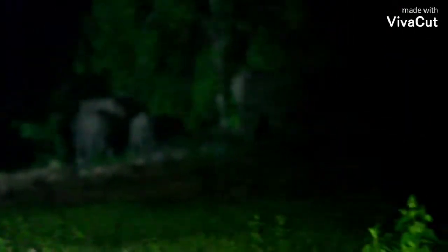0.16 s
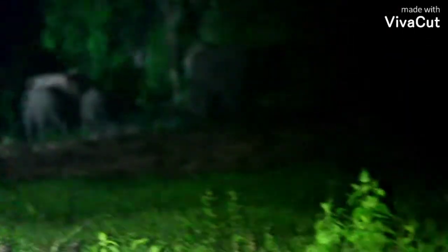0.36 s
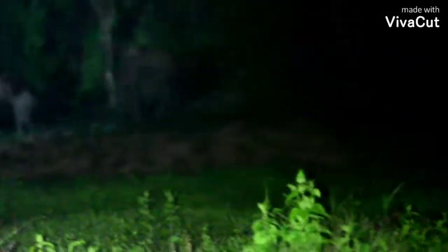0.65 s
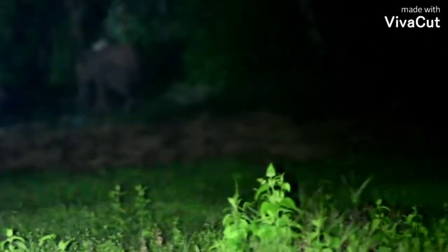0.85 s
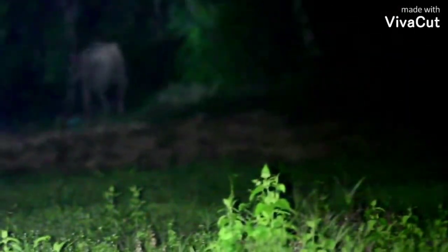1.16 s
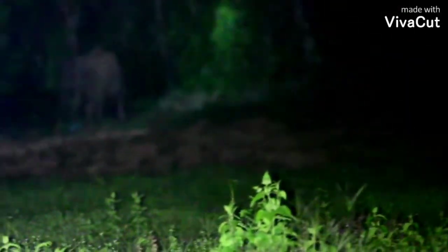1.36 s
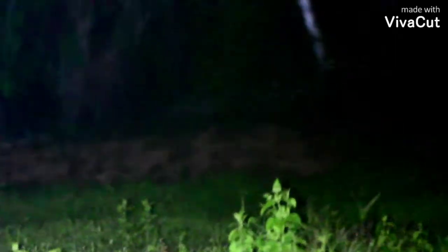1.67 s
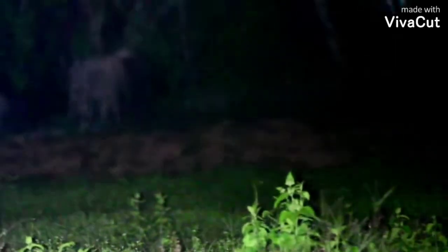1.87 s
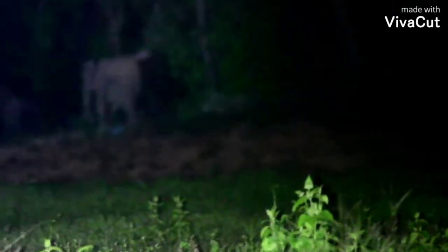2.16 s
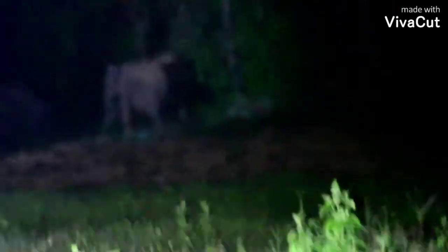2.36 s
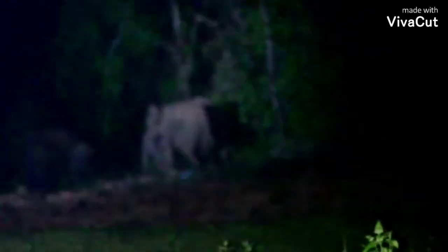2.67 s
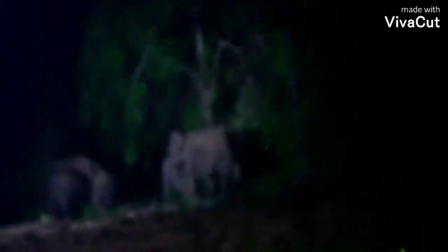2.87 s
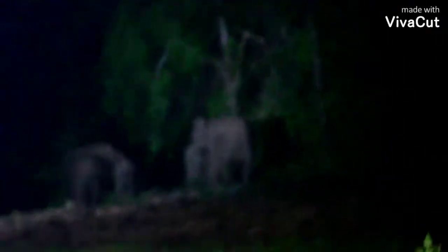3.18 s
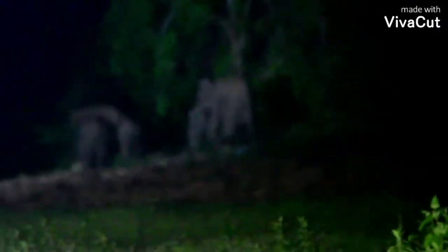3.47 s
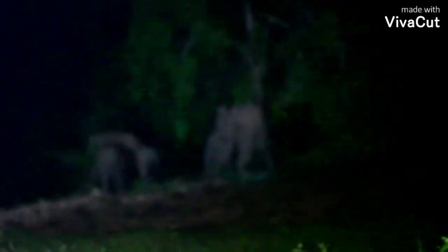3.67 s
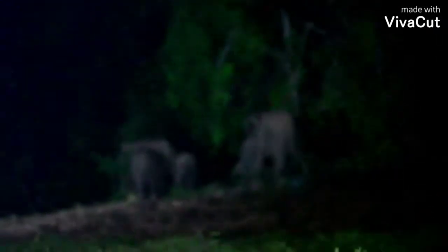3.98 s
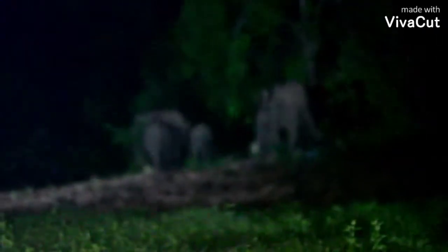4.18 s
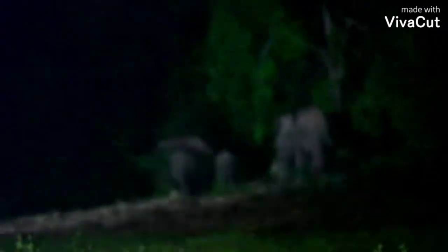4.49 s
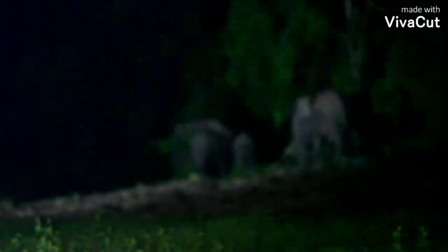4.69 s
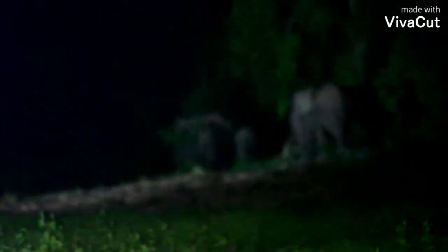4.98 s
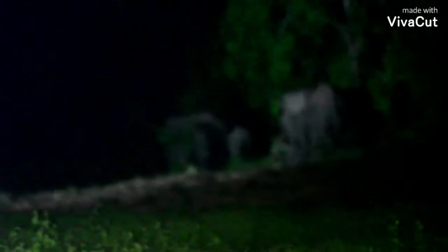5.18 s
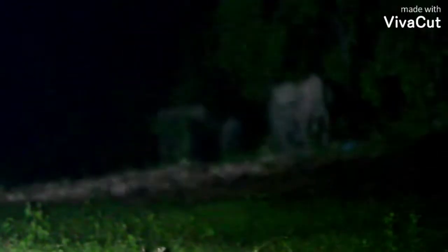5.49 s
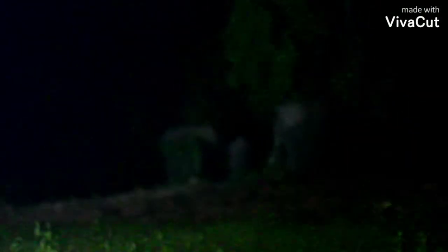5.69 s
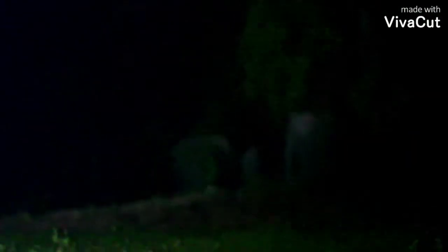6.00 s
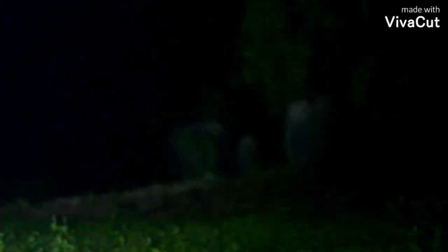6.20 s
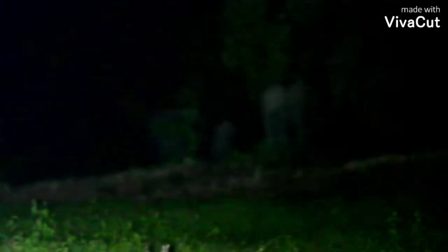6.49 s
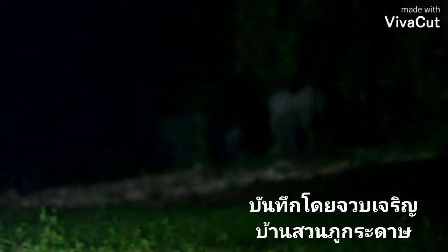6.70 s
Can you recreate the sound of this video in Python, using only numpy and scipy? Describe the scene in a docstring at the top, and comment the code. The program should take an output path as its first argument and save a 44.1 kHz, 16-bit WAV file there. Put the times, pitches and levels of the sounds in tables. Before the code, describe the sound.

At a forest edge at night, crickets hold a high, pulsing trill, joined by thinner, faster trillers and brief insect chirps. Dull handling bumps cluster at the start. A faint distant engine putters low, dips slightly, then speeds up around three seconds and settles into a throbbing drone. The hand-held microphone catches light rustles and ticks, with the insects stronger on the right.

```python
"""Crickets trill near 3 kHz at a forest edge at night, with higher trills and short insect bouts around them.
Every insect note is a short tone with a sliding pitch, returned by echoes among the trees.
A far single-cylinder engine putters, then speeds up under load to a steady drone: puffs ring resonances.
The hand-held microphone adds soft bumps, ticks and rustles: struck resonances and short noise.
Under it all lies night air, made of stereo noise bands that flicker separately."""
import sys
import numpy as np
from scipy import signal
from scipy.io import wavfile
from scipy.ndimage import uniform_filter1d

SR = 44100
rng = np.random.default_rng(int(sys.argv[2]) if len(sys.argv) > 2 else 0)


def master_out(mix):
    """Clip the mix to full scale and print it as 16-bit PCM to the path in sys.argv[1]."""
    frames = np.transpose(np.atleast_2d(mix))
    ceiling = np.clip(frames, -1, 1)
    pcm = np.round(ceiling * 32767).astype(np.int16)
    wavfile.write(sys.argv[1], SR, pcm)


N = 302085
TIME = np.arange(N) / SR

# Choirs in order lead, lower, fast trillers, thin trillers: pitch_hz, sweep_hz within a pulse, pulses_per_s,
# voice_spread_hz, left_minus_right_db, echo_db against direct, left_ear_lag_s
CHOIRS = [(3038, -190, 61, 30, -9.5, -1, .00016), (2895, -170, 58, 35, -8.5, 1, .00016),
          (6250, 650, 72, 105, -8, -1, .00011), (8900, -700, 45, 190, -9.5, -2, .00015)]
# Level of the two cricket choirs as the hand-held microphone moves, before their added gains:
# time_s, lead_level_db, lower_level_db
CRICKET_LEVELS = [(0.0, -47.5, -53), (0.68, -47.5, -51.5), (0.84, -46, -46.5), (1.1, -51, -54),
                  (1.33, -45.5, -51), (1.55, -48.5, -59), (1.72, -46, -48), (1.98, -49.5, -60),
                  (2.4, -48, -51), (3.53, -48, -60.5), (3.59, -47.5, -45.5), (4.48, -48.5, -56),
                  (4.67, -45, -49), (4.98, -48.5, -53.5), (6.64, -50, -50), (6.85, -46, -58)]
# Phrases of the fast trillers: middle_s, peak_level_db
TRILLER_PHRASES = [(.26, -58), (.43, -53), (.62, -59), (.78, -50.5), (.98, -59), (1.16, -51), (1.35, -54),
                   (1.51, -52.5), (1.72, -55), (1.87, -52), (2.28, -54), (2.47, -51), (2.65, -52),
                   (2.82, -50.5), (3.0, -52.5), (3.17, -50.5), (3.62, -52), (3.84, -50.5), (3.99, -49.5),
                   (4.26, -52.5), (4.45, -51), (4.61, -49.5), (4.81, -50.5), (5.0, -54), (5.5, -55),
                   (5.66, -52), (6.25, -54.5)]
# Runs of single insects: start_s, length_s, level_db, song_name
INSECT_BOUTS = [(0.046, 0.19, -57.5, "shrill"), (.05, 0.087, -62, "falling"), (0.232, 0.2, -53, "low"),
                (0.276, 0.14, -55, "falling"), (.532, 0.14, -57.5, "falling"), (0.688, .15, -61, "falling"),
                (1.03, 0.083, -62, "falling"), (1.252, .12, -62, "falling"), (1.35, 0.33, -59, "low"),
                (1.466, .12, -64, "falling"), (1.89, .17, -59, "falling"), (2.07, 0.44, -58, "buzz"),
                (2.5, 0.3, -60, "low"), (3.595, 0.24, -58, "low"), (4.652, 0.23, -55, "low"),
                (5.26, 0.087, -63, "falling"), (5.48, 0.096, -62, "falling"), (5.697, .12, -59, "falling"),
                (5.782, 0.17, -53, "low"), (5.943, 0.1, -61, "falling"), (6.127, .086, -45, "bright"),
                (6.163, 0.098, -58, "falling"), (6.411, 0.36, -56.5, "buzz"), (6.418, .12, -59, "falling"),
                (6.73, .12, -55, "low")]
# Songs by name: pitch_hz, sweep_hz within a pulse, pulses_per_s
INSECT_SONGS = {"falling": (4850, -1150, 25), "low": (3470, -330, 26), "buzz": (5900, -700, 100),
                "bright": (9140, -300, 46), "shrill": (10560, -600, 56)}
# Thin steady singers far off: pitch_hz, width_hz, level_db
FAR_WHINES = [(3394, 55, -64), (6345, 90, -65), (14694, 25, -72.5)]

# Engine speed: time_s, firings_per_s
ENGINE_SPEED = [(0.0, 17.616), (1.3, 17.608), (1.8, 16.667), (2.1, 18.503), (2.5, 19.616), (2.9, 19.973),
                (3.15, 23.044), (3.4, 25.086), (4.3, 25.045), (5.2, 25.535), (6.85, 25.626)]
# Level of the exhaust bark, before its trim: time_s, level_db
BARK_LEVEL = [(0.7, -66.5), (1.19, -65.5), (1.36, -59.5), (2.79, -61), (3.6, -42.5), (4.45, -48.5),
              (4.67, -48), (6.8, -45.5)]
# Deep exhaust resonances: pitch_hz, width_hz, relative_idle_db, relative_load_db
THUD_RESONANCES = [(52.3, 6.7, -37, -11), (75.4, 23, 1, -4.5), (99.5, 22, 8, -6.5), (117, 16, 3.5, -38),
                   (145.7, 40.5, 10.5, -10.5), (179.1, 11.5, -2, -2), (223.8, 24, -1, 0.5),
                   (261, 35, -21, -3.5)]
# Upper exhaust resonances: pitch_hz, width_hz, relative_idle_db, relative_load_db
BARK_RESONANCES = [(330.9, 13.6, 15, 9.5), (352.5, 7.3, 8, 15), (367.2, 4.2, -36, 11), (550, 11, -18, -15),
                   (790, 18, -3, 13)]
# Bands of rushing exhaust gas: pitch_hz, width_hz, idle_level_db, load_level_db
GAS_BANDS = [(337.5, 130, -59, -53), (490, 102, -72, -60.5), (1161, 120, -63.5, -68.5),
             (1570, 440, -89, -65)]

# Bumps on the microphone body, before the trim: time_s, peak_db, left_minus_right_db
MIC_BUMPS = [(0.009, -31.5, -13), (0.061, -33, -17), (0.127, -29, -23), (0.164, -26.5, -31),
             (0.388, -32, -16), (0.451, -27, -11), (0.555, -32, 5), (0.899, -36, 17), (3.419, -42, 17),
             (4.386, -47, -12), (4.839, -33.5, -2), (6.008, -32.5, -26)]
# Light rustles: start_s, level_db, t60_s (time to fall 60 dB)
MIC_RUSTLES = [(.327, -49.5, .2), (.69, -48, 0.14), (2.425, -47, 0.36), (3.51, -47, 0.14),
               (3.895, -41.5, 0.15), (4.805, -46.5, 0.58), (5.935, -51, 0.16), (6.375, -45, 0.21)]
# Small dry ticks, before their trim: start_s, peak_db
MIC_TICKS = [(0.376, -29), (6.333, -24)]
# Spectrum of the grip's rumble: frequency_hz, relative_db_per_hz
RUMBLE_SPECTRUM = [(25, -17), (50, -12.5), (80, -5), (140, -18), (250, -29.5), (600, -42), (2000, -66)]
# Spectrum of rustles and ticks: frequency_hz, relative_db_per_hz
RUSTLE_SPECTRUM = [(100, -24), (1500, -3), (4500, 0), (9000, -1), (14000, -14)]

# Spectrum of the night air: frequency_hz, relative_db_per_hz
AIR_SPECTRUM = [(30, 5), (70, 14.5), (200, 9.5), (400, 2.5), (650, 2), (1100, 0.5), (2000, -2), (3000, 1.5),
                (3800, -1.5), (5200, 0.5), (6500, 8.5), (7500, -6.5), (9300, -11.5), (11000, -9),
                (15000, -14)]
# How alike the two ears hear diffuse noise: frequency_hz, left_right_correlation (no unit)
EAR_LIKENESS = [(50, 0.092), (300, 0.62), (1000, 0.37), (2000, 0.17), (6000, 0.055), (14000, 0.049)]
# Stereo tilt of diffuse noise: frequency_hz, left_minus_right_db
EAR_BALANCE = [(50, -5), (500, 2.5), (2000, -3), (5000, -2), (9000, -1.5), (12000, -1.5)]


def from_db(db):
    """Decibels to gain."""
    return 10 ** (np.asarray(db) / 20)


def rms_one(x):
    """Scale to unit rms."""
    return x / np.sqrt(np.mean(x ** 2) + 1e-20)


def in_time(rows):
    """Draw each column of a table as a curve over the whole scene."""
    times, *columns = np.transpose(rows)
    return [np.interp(TIME, times, column) for column in columns]


def at_hz(points, hz):
    """Read a spectrum on a log-frequency axis."""
    points = np.array(points)
    return np.interp(np.log(hz), np.log(points[:, 0]), points[:, 1])


def pan(balance_db):
    """Left and right gains with a mean of one."""
    gains = from_db(np.array([[.5], [-.5]]) * balance_db)
    return gains / gains.mean()


def drift(rate):
    """Smoothed random wandering with unit rms, faster for a higher rate."""
    step = 40  # samples between the points of the curve
    r = np.exp(-2 * step * np.pi * rate / SR)
    noise = rng.standard_normal(N // step + 2002)
    slow = signal.lfilter([1], [1, -2 * r, r * r], noise)[2000:]  # skip the filter's start
    return np.interp(np.arange(N) / step, np.arange(len(slow)), rms_one(slow))


def resonate(x, hz, width):
    """A two-pole resonance, width in Hz, with unit gain on top."""
    r = np.exp(-np.pi * width / SR)
    top = np.array([1, 0, -1]) * (1 - r * r) / 2
    poles = [1, -2 * r * np.cos(2 * np.pi * hz / SR), r * r]
    return signal.lfilter(top, poles, x + 1e-18)


def wing_strokes(strokes, hz, sweep_hz, duty):
    """Each closing of the wings draws a file over a scraper: a short tone whose pitch slides."""
    along = np.minimum(strokes % 1 / np.clip(duty, .1, 1), 1)
    pitch = hz + sweep_hz * (along - .5)
    tone = np.sin(2 * np.pi * np.cumsum(pitch) / SR)
    return rms_one(np.sin(np.pi * along) * tone)


def among_trees(x, echo_db, lag_s=.00015, count=10):
    """Sound reaches the left ear late; trunks return echoes whose paths change as the microphone moves."""
    t60_s, path_speed, sound_speed = 1, .4, 343  # s, greatest path change in m/s, m/s
    direct = np.array([np.interp(TIME - lag_s, TIME, x), x])
    echoes = np.zeros((2, N))
    for k, (u, v) in enumerate(rng.random((2 * count, 2))):
        delay = .002 + .11 * u * u
        path_change = (2 * v - 1) * path_speed / sound_speed * TIME
        echo = np.interp(TIME - delay - path_change, TIME, x)
        echoes[k % 2] += from_db(-60 * delay / t60_s) * echo
    echoes *= x.std() / echoes.std(axis=1, keepdims=True)
    echo_gain = from_db(echo_db)
    return (direct + echo_gain * echoes) / np.sqrt(1 + echo_gain ** 2)


def choirs(duty=.7, fall_db=2.0, swell_db=0.94, lead_db=5, lower_db=3, count=3):
    """Each choir is one near singer and fainter neighbours, at slightly different pitches and pulse rates."""
    lead, lower = in_time(CRICKET_LEVELS)
    levels = from_db(lead + lead_db), from_db(lower + lower_db), triller_level(), thin_level()
    out = 0
    for level, (hz, sweep_hz, per_s, spread_hz, balance_db, echo_db, lag_s) in zip(levels, CHOIRS):
        voices = 0
        for k in range(count):
            rate = per_s * (1 + .012 * drift(2) + .06 * k * rng.uniform(-1, 1))
            pitch = hz + spread_hz * ((k + 1) % count - 1 + .6 * drift(30))
            strokes = np.cumsum(rate) / SR + rng.random()
            voice = wing_strokes(strokes, pitch, sweep_hz, duty)
            # the near singer (k = 0) holds steady while its neighbours swell and fade
            voices = voices + voice * from_db(k * (swell_db * drift(2.9) - fall_db))
        out = out + rms_one(among_trees(voices, echo_db, lag_s)) * level * pan(balance_db)
    return out


def triller_level(phrase_s=.16, between_db=-57):
    """Short rounded phrases of one length stand out of a quiet running trill."""
    phrases = 0
    for middle_s, peak_db in TRILLER_PHRASES:
        along = np.clip((TIME - middle_s) / phrase_s, -.5, .5)
        phrases = phrases + from_db(peak_db) * np.cos(np.pi * along)
    return np.hypot(phrases, from_db(between_db))


def thin_level(mean_db=-59.5, wander_db=4.0):
    """The thin trill swells and sinks at random around a mean level."""
    return from_db(mean_db + wander_db * drift(3.5))


def bouts(waver_hz=40):
    """Single insects break in with short runs of sliding pulses, each pulse at a slightly different pitch."""
    out = 0
    for start, length, level_db, name in INSECT_BOUTS:
        hz, sweep_hz, per_s = INSECT_SONGS[name]
        age = TIME[:round(length * SR)]
        pulse = (age * per_s).astype(int)
        pitch = hz + waver_hz * rng.normal(size=99)[pulse]
        song = wing_strokes(age * per_s, pitch, sweep_hz, duty=.55)
        swell = np.sqrt(np.sin(np.pi * age / length).clip(0))  # each run swells and fades
        placed = np.interp(TIME - start, age, rms_one(song * swell), left=0, right=0)
        out = out + placed * from_db(level_db)
    return among_trees(out, echo_db=-9) * pan(-7)


def double_chirper(hz=7640, level_db=-69):
    """A small cricket gives two notes and rests for two, four times a second."""
    strokes = (TIME - .095) * 16.08  # notes and rests per second
    song = wing_strokes(strokes, hz + 22 * drift(30), sweep_hz=-60, duty=.5)
    song = song * (strokes % 4 < 2)
    return among_trees(song * from_db(level_db), echo_db=-6) * pan(-8)


def engine(second_s=0.00824, second_share=0.58, soft_hz=500, muffled_hz=210, open_bark_db=-58, bark_db=-1,
           full_rush_db=-58, intake_s=0.0196, intake_hz=110, intake_width=70, intake_db=-5, muffler_width=170):
    """One soft exhaust puff per firing rings the pipe; load shifts the ring upwards."""
    rate, = in_time(ENGINE_SPEED)
    bark_level, = in_time(BARK_LEVEL)
    # the thud grows by 0.7759 dB for each firing per second above 17
    thud_level = -50.5 + 0.7759 * (rate - 17)
    # load is read from the speed: 0 at the slowest, 1 at the fastest
    load = np.clip((rate - rate.min()) / np.ptp(rate), 0, 1) ** 2
    cycles = np.cumsum(rate) / SR + .14
    # firings grow more even under load
    unevenness_db = (1.2 - .7 * load) * drift(10)
    puffs = -np.diff(np.floor(cycles), prepend=0) * from_db(unevenness_db)
    # at idle a second puff follows each firing
    puffs = puffs + second_share * (1 - load) * np.interp(TIME - second_s, TIME, puffs)
    # the valve opens gradually and distance dulls the edge
    puffs = signal.sosfilt(signal.butter(4, soft_hz, fs=SR, output="sos"), puffs)

    def pipe(modes):
        """The resonances ring together, at an even overall level."""
        ring = 0
        for hz, width, idle, full in modes:
            # the muffler chamber makes each ring build up gradually
            mode = resonate(resonate(puffs, hz, muffler_width), hz, width)
            ring = ring + mode * from_db(idle + (full - idle) * load)
        return ring / np.sqrt(uniform_filter1d(ring ** 2, size=SR // 2) + 1e-20)

    # between firings the working engine gulps air
    gulp = resonate(np.interp(TIME - intake_s, TIME, puffs), intake_hz, intake_width)
    gulp = resonate(gulp, intake_hz, 3 * intake_width)
    intake = rms_one(gulp) * load * from_db(intake_db)
    # gas rushes strongest at each firing, and more as the bark grows
    pulsing = 1 + 0.25 * np.cos(2 * np.pi * cycles)
    rush = rng.standard_normal(N) * pulsing * from_db(np.minimum(bark_level - full_rush_db, 0))
    gas = 0
    for hz, width, idle, full in GAS_BANDS:
        band = rms_one(resonate(resonate(rush, hz, width), hz, 2 * width))
        gas = gas + band * from_db(idle + (full - idle) * load)
    thud = (pipe(THUD_RESONANCES) + intake) * from_db(thud_level)
    # while the bark is faint the thud is muffled too
    muffled = signal.sosfiltfilt(signal.butter(2, muffled_hz, fs=SR, output="sos"), thud)
    thud = muffled + (thud - muffled) * from_db(np.minimum(bark_level - open_bark_db, 0))
    bark = pipe(BARK_RESONANCES) * from_db(bark_level + bark_db)
    return thud * pan(-2.4) + (bark + gas) * pan(-2.3)


def handling(bump_hz=110, bump_width=55, bump_db=-1, unsteady_db=3, tick_t60=0.019, tick_db=-10):
    """The grip shifts: each dull bump stirs up a short rumble; light rustles and ticks come between."""
    grip_db, stir_db = -64.5, -8.5  # rumble at rest; stirred rumble against the listed bump peak
    stir_rise_s, stir_t60_s = .04, .45
    bumps, friction = np.zeros((2, N)), np.zeros(N)
    rumble_power = from_db(grip_db + unsteady_db * drift(1.6)) ** 2
    for s, peak_db, balance_db in MIC_BUMPS:
        tap = 1. * (np.arange(N) == round(s * SR))
        knock = resonate(resonate(tap, bump_hz, bump_width), bump_hz, 2 * bump_width)
        bumps -= knock / abs(knock).max() * from_db(peak_db + bump_db) * pan(balance_db)
        # the rumble rises just ahead of the bump and dies away after it
        rise = np.clip(1 + (TIME - s) / stir_rise_s, 0, 1)
        fall_db = 60 * np.clip((TIME - s) / stir_t60_s, 0, 2)
        rumble_power = rumble_power + (rise * from_db(peak_db + stir_db - fall_db)) ** 2
    ticks = [(s, peak_db + tick_db, tick_t60) for s, peak_db in MIC_TICKS]
    for s, level_db, t60 in list(MIC_RUSTLES) + ticks:
        rise = np.clip((TIME - s) / (0.037 * t60), 0, 1)
        friction += rise * from_db(level_db - 60 * np.clip((TIME - s) / t60, 0, 2))
    rumble = np.sqrt(rumble_power) * diffuse_noise(RUMBLE_SPECTRUM, patchy_db=1.5)
    grain = from_db(2 * drift(120))  # fast unevenness of the rubbing
    return bumps + rumble + friction * grain * diffuse_noise(RUSTLE_SPECTRUM, patchy_db=1.5)


def whines():
    """Far singers blur into narrow steady tones: noise through sharp resonances."""
    out = 0
    for (hz, width, level_db), balance_db in zip(FAR_WHINES, (-6, -6, 1)):
        noise = rng.standard_normal((2, N))
        tone = rms_one(resonate(resonate(noise, hz, width), hz, width))
        out = out + from_db(level_db) * tone * pan(balance_db)
    return out


def diffuse_noise(spectrum, patchy_db):
    """Half-octave bands of stereo noise, each with its own flicker, likeness and balance."""
    out, edges = 0, 24 * 2 ** np.arange(0, 9.6, .5)
    white = rng.standard_normal((2, 2, N))  # neighbouring bands take turns between two noises
    for k, (low, high) in enumerate(zip(edges, edges[1:])):
        band = signal.butter(2, [low, high], "band", fs=SR, output="sos")
        mid, side = signal.sosfilt(band, white[k % 2])
        hz = np.sqrt(low * high)
        alike = np.clip(at_hz(EAR_LIKENESS, hz), -1, 1)
        level_db = at_hz(spectrum, hz) + patchy_db * drift(11.3)
        stereo = np.sqrt(1 + alike) * mid + np.sqrt(1 - alike) * side * [[1], [-1]]
        out = out + from_db(level_db) * pan(at_hz(EAR_BALANCE, hz)) * stereo
    return rms_one(out)


def night_air(level_db=-49):
    """The soft bed of the night: broad noise whose bands flicker slightly."""
    return from_db(level_db) * diffuse_noise(AIR_SPECTRUM, patchy_db=1.0)


def scene():
    """Insects, engine and handling over the night air."""
    insects = choirs() + bouts() + double_chirper() + whines()
    return insects + engine() + handling() + night_air()


def record(dry):
    """The microphone thins the deepest bass, below 32 Hz, and the top is cut steeply at 15.2 kHz."""
    thinned = signal.sosfilt(signal.butter(2, 32, "high", fs=SR, output="sos"), dry)
    return signal.sosfilt(signal.ellip(12, .1, 80, 15200, fs=SR, output="sos"), thinned)


dry = scene()
out = record(dry)
master_out(out)
```